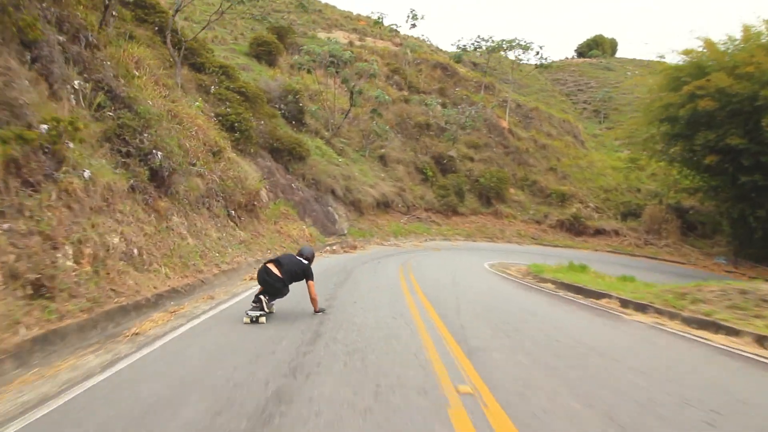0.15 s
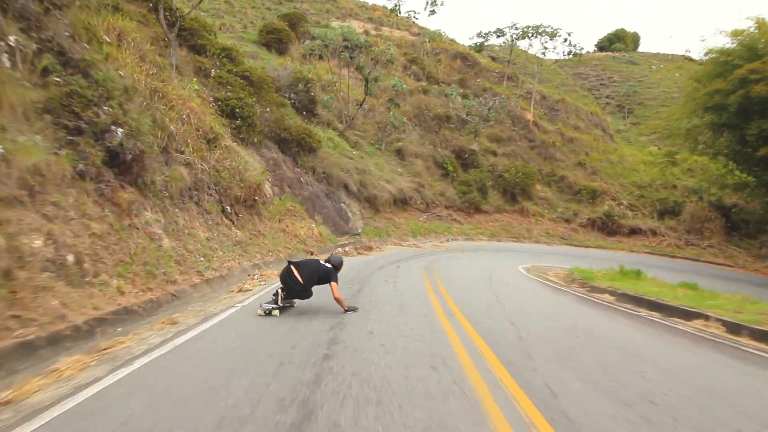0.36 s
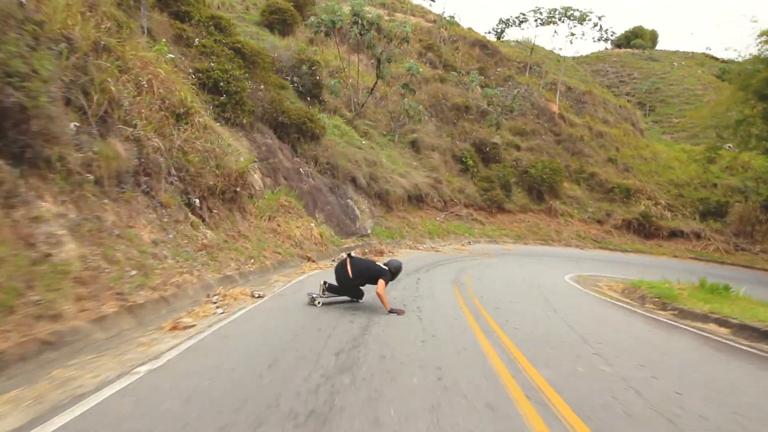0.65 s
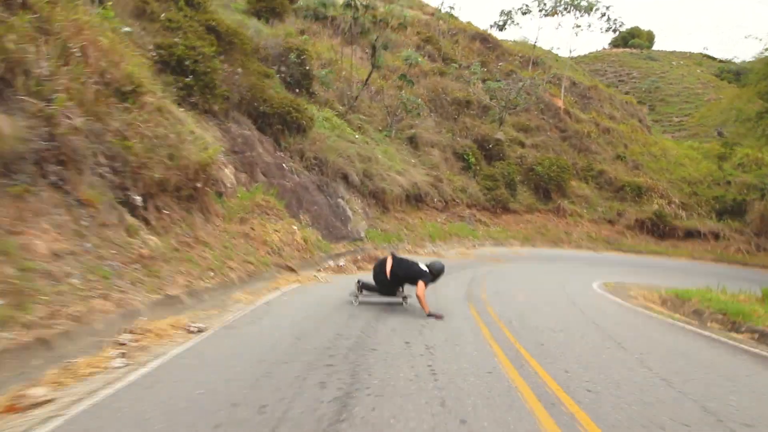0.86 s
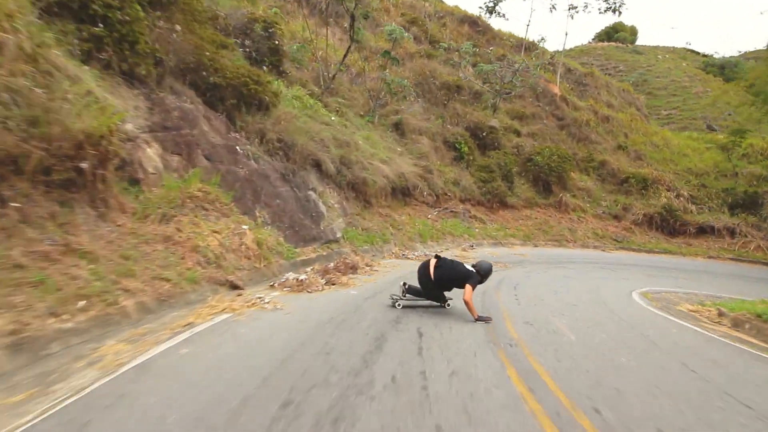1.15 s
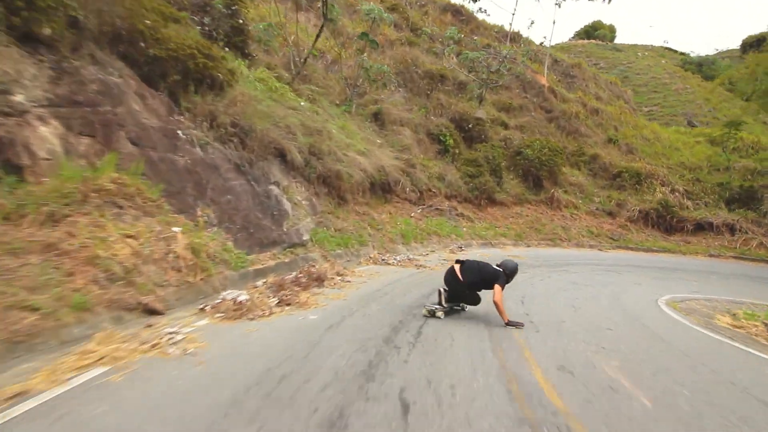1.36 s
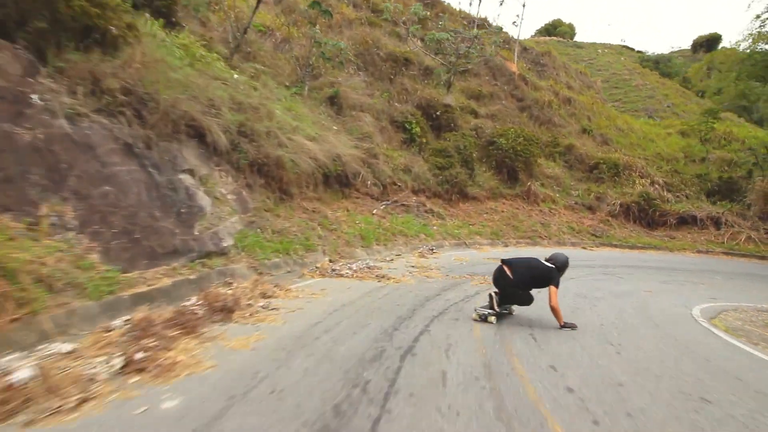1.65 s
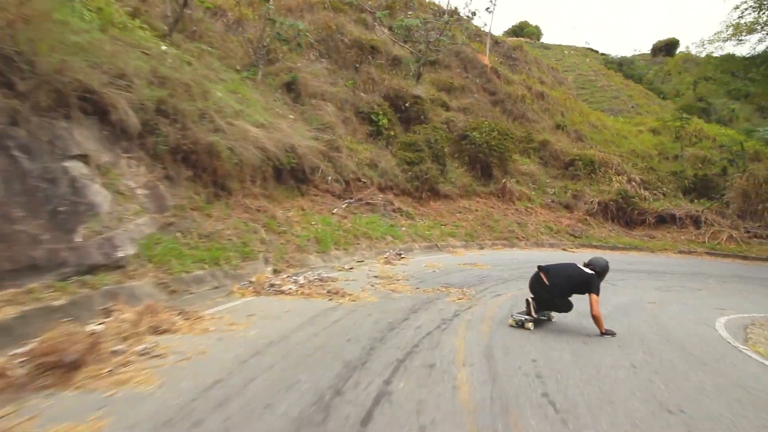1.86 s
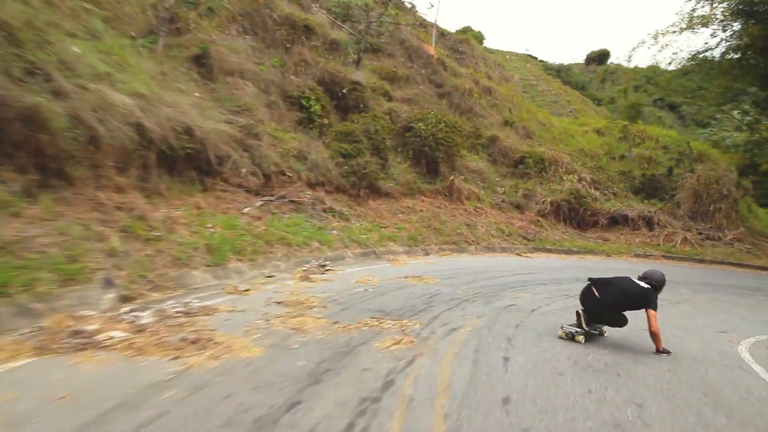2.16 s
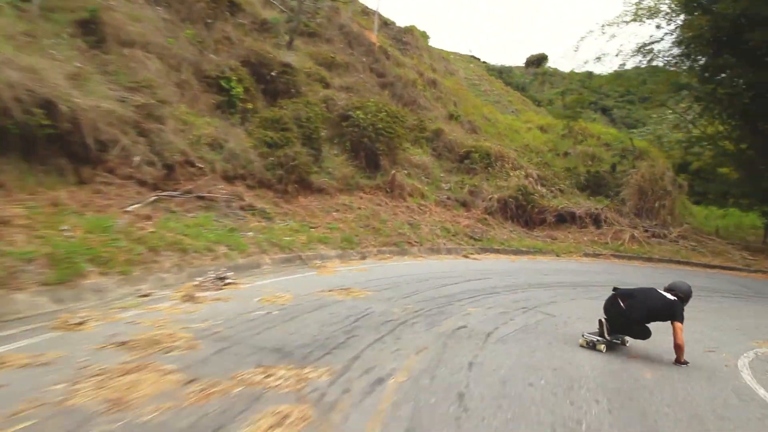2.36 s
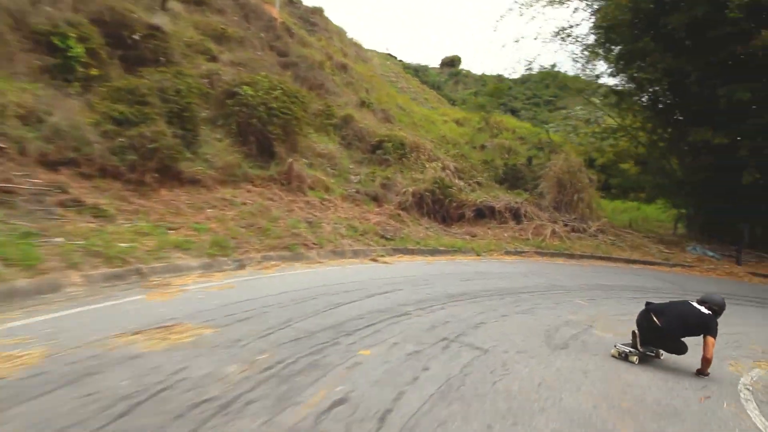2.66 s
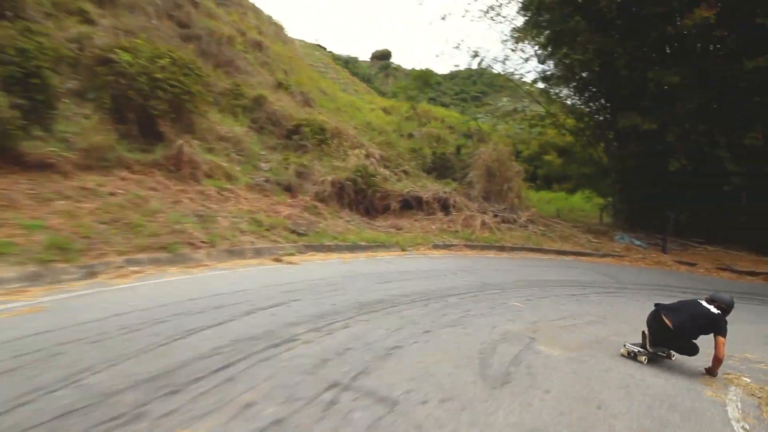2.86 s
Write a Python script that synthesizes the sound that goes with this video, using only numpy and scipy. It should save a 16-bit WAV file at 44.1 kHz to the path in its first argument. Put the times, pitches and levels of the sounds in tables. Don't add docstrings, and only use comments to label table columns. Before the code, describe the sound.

Strong wind buffets a moving microphone with rumble, slaps and crackles, over faint longboard wheel hiss.

```python
import sys
import numpy as np
from scipy import signal
from scipy.fft import rfft, irfft, next_fast_len
from scipy.io import wavfile
from scipy.ndimage import uniform_filter1d

SR = 44100
rng = np.random.default_rng(int(sys.argv[2]) if len(sys.argv) > 2 else 0)


def natural_amplitude(level_db):
    exponent = np.asarray(level_db, float) / 20
    return 10 ** exponent


def transcribe(signal):
    frames = np.atleast_2d(signal).T
    limited = np.clip(frames, -1, 1)
    pcm = np.round(limited * 32767).astype(np.int16)
    wavfile.write(sys.argv[1], SR, pcm)


N = 133623
T = np.arange(N) / SR
SNAP_LOW_HZ = 1850


def port(wind, puffs, slaps):
    # frequency in Hz, level in dB per Hz.
    rumble_colour = [(20, -34), (80, -3.5), (190, -0.5), (500, -8), (1200, -23.5), (3000, -45),
                     (7000, -66.5), (16000, -91.5)]
    gust_db = column(wind, T, order=1)
    bite_db = column(wind, T, order=2) + 22
    for s, length, change_db in puffs:
        phase = np.clip((T - s) / length, -0.5, 0.5)
        gust_db = gust_db + change_db * np.cos(np.pi * phase) ** 2

    lumps_db = -4 + 3.5 * wander(top_hz=68.8)
    flicker_db = 6.5 * np.tanh(wander(top_hz=164.2))
    rumble = natural_amplitude(lumps_db) * noise(rumble_colour, bite_db + flicker_db, patch_db=0.74)

    lean = 0.36
    widths_ms = np.geomspace(0.57, 2.66, num=8)
    eddies = stream(440, 6.5, [eddy(w, 0.33 * w + 0.042, lean) for w in widths_ms])
    snaps = stream(500, 4, [snap(hz) for hz in np.geomspace(SNAP_LOW_HZ, 6960, num=8)])
    small = rumble + natural_amplitude(-4 + 0.98 * bite_db) * eddies + natural_amplitude(-34.5 + 0.79 * bite_db) * snaps

    swept, big = np.zeros((2, N))
    for s, jump_db, way, edge_ms in slaps:
        add(swept, s, 0.32 * np.hanning(501))
        slap = eddy(0.51 + edge_ms, edge_ms, lean)
        add(big, s, np.sign(way) * natural_amplitude(jump_db - 4.5) * slap)
    return natural_amplitude(gust_db) * small * np.clip(1 - swept, 0.1, 1) + big


def eddy(width_ms, edge_ms, lean):
    t = np.arange(-400, 401) * 1000 / SR
    soft_edge = 0.65 * np.tanh(2 * t / edge_ms)
    crisp_corner = 0.25 * np.sign(t) * (1 - np.exp(-3 * abs(t) / edge_ms))
    fade = np.exp(-(t / width_ms / np.where(t > 0, 1.11, 1)) ** 2)
    shape = (soft_edge + crisp_corner) * (1 + lean * np.tanh(t / width_ms)) * fade
    under = np.exp(-(t / width_ms / 3.6) ** 2)
    return shape - shape.sum() * under / under.sum()


def snap(hz):
    turns = np.arange(-100, 101) * hz / SR
    return (SNAP_LOW_HZ / hz) ** 1.27 * np.sin(2 * np.pi * turns) * np.exp(-(turns / 0.65) ** 2)


def stream(per_s, spread_db, shapes):
    when, way, kind = rng.random((N, 3)).T
    size_db = spread_db * np.minimum(rng.exponential(1, N), 2)
    size = natural_amplitude(size_db) * (when < per_s / SR)
    size *= np.where(way < 0.65, -1, 1)
    kind = (kind * len(shapes)).astype(int)
    out = np.zeros(N)
    for k, shape in enumerate(shapes):
        out += signal.oaconvolve(size * (kind == k), shape, "same")
    return evened(out)


def crackle(cracks):
    t = np.arange(-150, 151) * 1000 / SR
    low = signal.butter(2, 3230, "low", fs=SR, output="sos")
    high = signal.butter(1, 1400, "high", fs=SR, output="sos")
    out = np.zeros(N)
    for s, db in cracks:
        grit = rng.standard_normal(len(t))
        burst = signal.sosfilt(np.vstack([low, high]), grit) * np.exp(-(t / 0.88) ** 2)
        add(out, s, natural_amplitude(14.5 + db) * burst / np.linalg.norm(np.diff(burst)))
    return out


def wheels():
    # frequency in Hz, level in dB per Hz.
    road_colour = [(200, -1), (700, -3), (2000, -9.5), (4500, -21), (8000, -32.5), (16000, -51)]
    # time in seconds, level in dB.
    rolling = [
        (0, -86),
        (.25, -60.5),
        (.68, -53),
        (.95, -57.5),
        (1.5, -62),
        (2.1, -60),
        (2.35, -64.5),
        (3.03, -63.5),
    ]
    # time in seconds, level in dB, pitch in Hz.
    sliding = [
        (1.35, -52, 933),
        (1.6, -43.5, 1020),
        (2.2, -53, 1050),
        (2.4, -73, 1064),
        (3.03, -66.5, 1017),
    ]
    # multiple of the pitch, width in Hz, level in dB.
    scrub_bands = [(2.0, 330, -13), (3.0, 380, -14), (3.75, 480, -17.5)]
    roll_db = 10.5 + column(rolling, T, order=1) + 2.4 * wander(top_hz=28.9)
    out = natural_amplitude(roll_db) * noise(road_colour, 0 * T, patch_db=2.2)
    pitch_hz = column(sliding, T, order=2)
    slide_db = column(sliding, T, order=1)
    for multiple, width, db in scrub_bands:
        turn = np.exp(2j * np.pi * np.cumsum(multiple * pitch_hz) / SR)
        r = np.exp(-np.pi * width / SR)
        poles = np.convolve([1, -r], [1, -r])
        band = (turn * signal.lfilter([1], poles, rng.standard_normal(N) / turn)).real
        out += natural_amplitude(db + slide_db + 2.9 * wander(top_hz=61)) * evened(band)
    return out


def noise(spectrum, tilt_db, patch_db):
    frames, hz = N // 128 + 5, np.fft.rfftfreq(512, 1 / SR)
    a, b, patches = rng.standard_normal((frames, 257, 3)).T
    patches = uniform_filter1d(patches, size=14, axis=0)
    patches = evened(uniform_filter1d(patches, size=5, axis=1))
    share = np.clip(np.log2((hz + 1) / 206) / 2.92, 0, 1.2)[:, None]
    tilt = tilt_db[np.minimum(np.arange(frames) * 128, N - 1)]
    cells = (a + 1j * b) * natural_amplitude(share * tilt + patch_db * patches)
    white = signal.istft(cells, nperseg=512, noverlap=384)[1][:N]
    size = next_fast_len(N)
    colour = natural_amplitude(read(spectrum, np.fft.rfftfreq(size, 1 / SR)))
    return evened(irfft(rfft(white, size) * colour, size)[:N])


def wander(top_hz):
    hz = np.geomspace(top_hz / 12, top_hz, num=30)[:, None]
    waves = np.sin(2 * np.pi * (hz * T + rng.random(hz.shape)))
    return evened((waves / hz ** 0.18).sum(axis=0))


def evened(x):
    return x / np.sqrt(np.mean(x ** 2) + 1e-20)


def read(points, hz):
    f, value = np.transpose(points)
    return np.interp(np.log(hz + 1), np.log(f + 1), value)


def column(table, t, order):
    rows = np.array(table)
    return np.interp(t, rows[:, 0], rows[:, order])


def add(mix, s, sound):
    part = mix[round(s * SR) - len(sound) // 2:][:len(sound)]
    part += sound[:len(part)]


def scene():
    # time in seconds, gust level in dB, bite of the eddies in dB.
    wind_l = [(0.0, -20.5, -22), (0.18, -18.5, -29), (0.32, -17.5, -20), (0.7, -26, -15), (1.76, -18, -26),
              (1.79, -49, -10), (1.82, -17, -19), (1.88, -29.5, -26), (1.95, -26, -27), (2.01, -14, -30),
              (2.04, -9.5, -31.5), (2.09, -20.5, -29.5), (2.2, -28, -20), (2.23, -18.5, -23.5),
              (2.39, -27.5, -15.5), (2.6, -27.5, -15.5), (2.66, -20.5, -23.5), (3.03, -23.5, -18.5)]
    wind_r = [(0.0, -18, -16.5), (0.17, -25, -12), (0.22, -20, -27), (0.6, -9, -25), (0.67, -18.5, -15),
              (0.82, -10.5, -30), (1.22, -17.5, -21.5), (1.68, -19, -30.5), (1.91, -11, -37),
              (1.96, -19.5, -36), (2.06, -14.5, -34), (2.3, -10.5, -31), (2.57, -13.5, -29.5),
              (2.6, -15, -20.5), (2.83, -10.5, -41.5), (2.86, -12.5, -23.5), (2.94, -12, -39),
              (3.03, -6.5, -31)]
    # centre in seconds, length in seconds, change in dB.
    puffs_l = [(0.01, 0.034, -22), (0.134, 0.082, -24), (0.195, 0.049, -20), (0.21, 0.021, 11),
               (0.48, 0.15, -8), (0.609, 0.052, -15.5), (0.626, 0.2, 7), (0.705, 0.046, -5),
               (1.435, 0.1, 5), (1.92, 0.05, -10), (2.109, 0.094, -15), (2.123, 0.025, 19),
               (2.312, 0.045, -14), (2.476, 0.054, 5.5), (3.023, 0.027, -6)]
    puffs_r = [(0.285, 0.027, 4.5), (0.338, 0.056, -10), (0.43, 0.067, 6), (0.556, 0.038, -5.5),
               (1.353, 0.14, -0.5), (1.447, 0.29, 3.5), (1.591, 0.042, -2.5), (1.878, 0.04, -2.5),
               (1.928, 0.043, -9.5), (2.066, 0.014, 8), (2.161, 0.017, -24), (2.257, 0.073, -11),
               (2.278, 0.027, 7)]
    # time in seconds, pressure jump in dB,
    # direction (+1 or -1), edge in ms.
    slaps_l = [(0.0713, -6.5, -1, 0.23), (0.2131, -2, -1, 0.32), (0.3639, -2.5, 1, 0.44),
               (0.3963, -1.5, -1, 0.32), (0.4602, -8.5, 1, 0.15), (0.548, -8, 1, 0.16),
               (0.581, -1, 1, 0.32), (0.6579, -14, -1, 0.2), (0.7707, -5, 1, 0.18), (0.852, -3, -1, 0.29),
               (0.9608, -3, -1, 0.28), (0.981, -2.5, -1, 0.27), (1.0361, 3.5, -1, 0.61),
               (1.1066, -0.5, -1, 0.42), (1.1193, -5.5, -1, 0.2), (1.1365, -8, -1, 0.36),
               (1.2812, -2, 1, 0.3), (1.4366, -7.5, 1, 0.21), (1.6791, 0, -1, 0.63), (1.7415, -8, -1, 0.41),
               (1.847, -2.5, -1, 0.54), (1.825, -3, -1, 0.34), (1.8753, 5.5, -1, 0.7),
               (2.041, -0.5, -1, 0.35), (2.1225, -2, -1, 0.56), (2.5827, -6, 1, 0.16),
               (2.9818, 0.5, 1, 0.62)]
    slaps_r = [(0.0288, -5, -1, 0.15), (0.0515, -8, -1, 0.11), (0.1226, -8.5, 1, 0.12),
               (0.1344, 0.5, -1, 0.29), (0.1678, 1, -1, 0.42), (0.4206, -10, 1, 0.17),
               (0.434, -5, -1, 0.11), (0.591, -2, -1, 0.36), (0.6136, -5.5, -1, 0.37),
               (0.6701, 4.5, 1, 0.46), (0.6859, -8.5, -1, 0.097), (0.7694, -2, 1, 0.37),
               (0.7861, -3.5, -1, 0.49), (1.1013, -2.5, -1, 0.42), (1.116, 5.5, -1, 0.52),
               (1.161, -11, 1, 0.32), (1.1916, 4, -1, 0.36), (1.244, 4.5, -1, 0.42),
               (1.2777, -9.5, -1, 0.18), (1.4795, -14, -1, 0.45), (2.0666, 3.5, -1, 0.57),
               (2.0799, 2, -1, 0.45), (2.2764, 5.5, -1, 0.61), (2.3226, 4, -1, 1), (2.402, -5.5, -1, 1),
               (2.4566, 1, 1, 0.49), (2.5442, 1.5, -1, 0.5), (2.6113, -5, -1, 0.15), (2.857, 3, -1, 1),
               (1.7, 2.5, -1, 0.55),
        (2.2732, -3.5, 1, 0.15),
        (1.8, 8, -1, 1),
        (2.1785, -2.5, -1, 0.4),
    ]
    # time in seconds, level in dB.
    cracks_l = [(0.048, -41), (0.2178, -43), (0.3152, -44), (0.337, -53), (0.3698, -36), (0.3846, -43.5),
                (0.4586, -40), (0.5478, -42), (0.5798, -40), (0.6071, -39), (0.6571, -34.5), (0.7026, -46),
                (0.7712, -39), (0.8218, -41), (0.8285, -45.5), (0.8611, -36.5), (0.9356, -46),
                (0.9803, -43), (0.9886, -47), (0.9983, -42), (1.0504, -36.5), (1.0687, -43), (1.1103, -43),
                (1.1193, -36.5), (1.1273, -56), (1.1364, -44), (1.1459, -44), (1.1831, -46.5),
                (1.1943, -45), (1.2551, -43), (1.2648, -43.5), (1.2721, -48), (1.2813, -36.5),
                (1.3014, -43), (1.3745, -45), (1.4309, -42.5), (1.4363, -42), (1.4448, -48), (1.4918, -58),
                (1.5449, -47.5), (1.6109, -42.5), (1.7058, -43.5), (1.7586, -48.5), (1.8245, -45.5),
                (2.0417, -50), (2.3239, -49), (2.3385, -48), (2.4282, -55.5), (2.5832, -39.5),
                (2.7398, -50), (2.7828, -58), (2.8101, -47), (2.9696, -49), (3.0064, -47)]
    cracks_r = [(0.0122, -35), (0.0283, -39), (0.0857, -40), (0.1105, -41), (0.1219, -44), (0.1342, -41),
                (0.14, -41), (0.1677, -38.5), (0.1904, -50.5), (0.3845, -41.5), (0.4209, -42),
                (0.4323, -36), (0.4898, -41.5), (0.5336, -43), (0.5924, -41), (0.613, -39), (0.6335, -40.5),
                (0.6666, -33), (0.672, -38), (0.6807, -45.5), (0.6866, -40), (0.7217, -38.5),
                (0.7698, -37.5), (0.7844, -41), (0.8936, -56), (0.9123, -37.5), (0.936, -41), (0.9434, -44),
                (1.0475, -43), (1.0639, -46), (1.1001, -39), (1.1073, -40.5), (1.1604, -46),
                (1.1866, -38.5), (1.1963, -43), (1.2438, -39), (1.2782, -43.5), (1.4599, -49),
                (1.5376, -39), (1.6094, -47.5), (1.7455, -41), (2.0677, -49), (2.2737, -40), (2.3223, -53),
                (2.3704, -58), (2.471, -51), (2.5931, -58), (2.6117, -52), (2.6268, -56), (2.6692, -49.5),
                (2.7235, -47), (2.8727, -51), (2.8809, -40.5), (2.9824, -44)]
    left = port(wind_l, puffs_l, slaps_l) + crackle(cracks_l)
    right = port(wind_r, puffs_r, slaps_r) + crackle(cracks_r)
    return np.array([left, right]) + wheels()


def roll_off(x):
    return signal.sosfilt(signal.butter(12, 15800, fs=SR, output="sos"), x)


def record(dry):
    x = signal.sosfilt(signal.butter(2, 47.4, "high", fs=SR, output="sos"), dry)
    x = signal.sosfilt(signal.butter(1, 9600, "low", fs=SR, output="sos"), x)
    other = signal.sosfiltfilt(signal.butter(1, 3160, "low", fs=SR, output="sos"), x[::-1])
    wide = x - 0.43 * other
    limited = wide / (1 + (wide / 0.97) ** 4) ** (1 / 4)
    return roll_off(limited)


dry = scene()
out = record(dry)
transcribe(out)
```